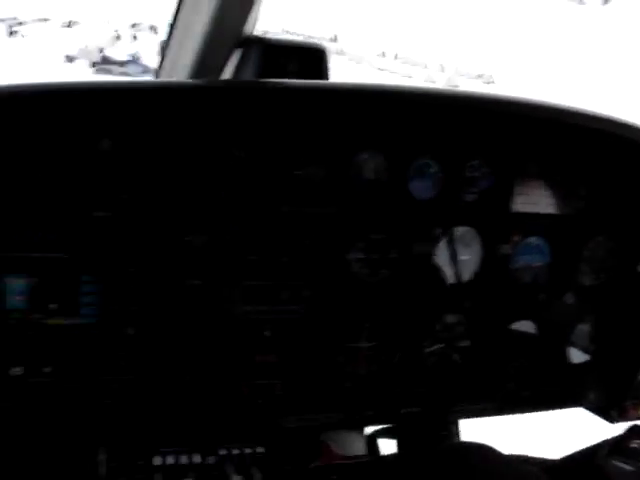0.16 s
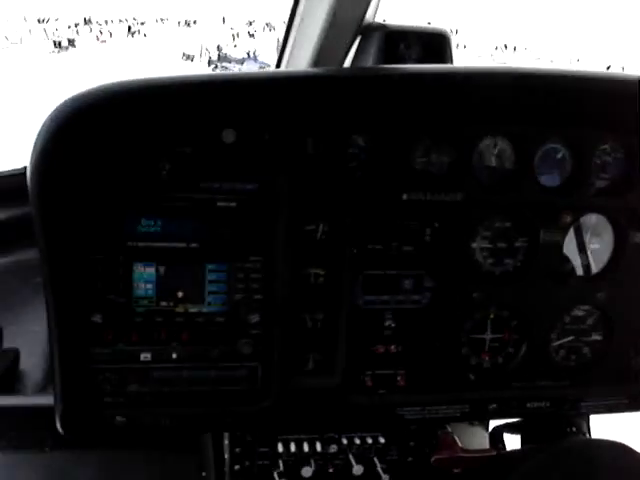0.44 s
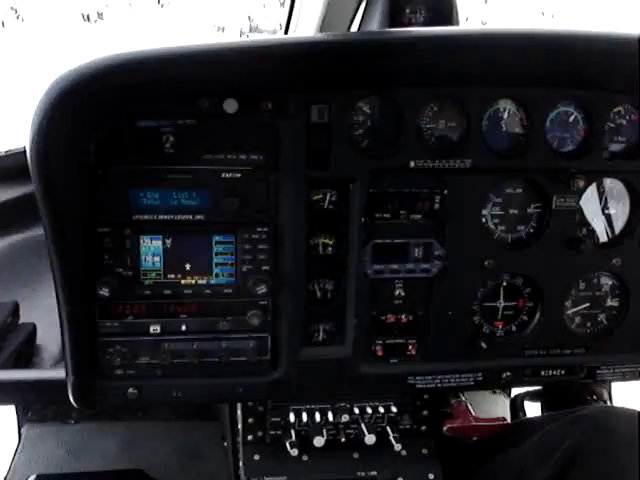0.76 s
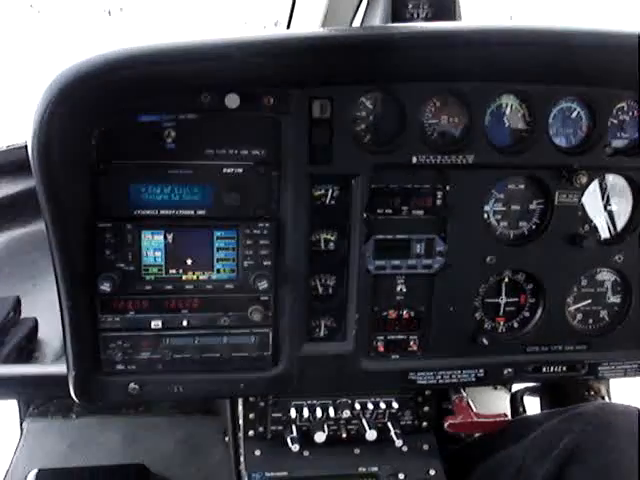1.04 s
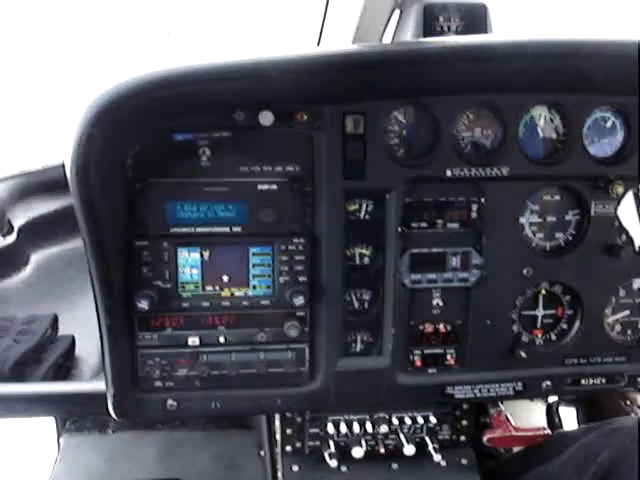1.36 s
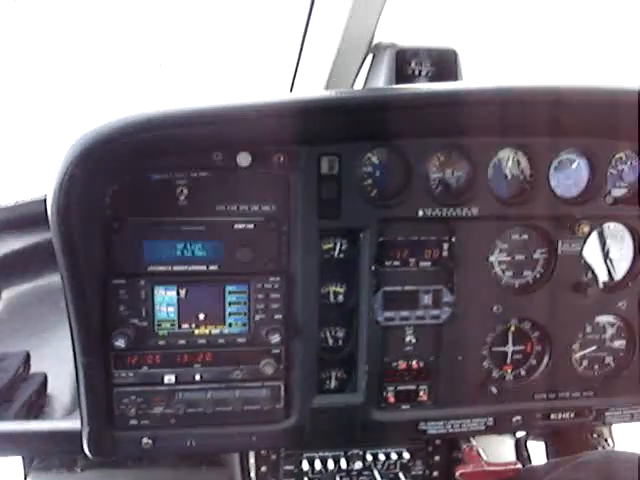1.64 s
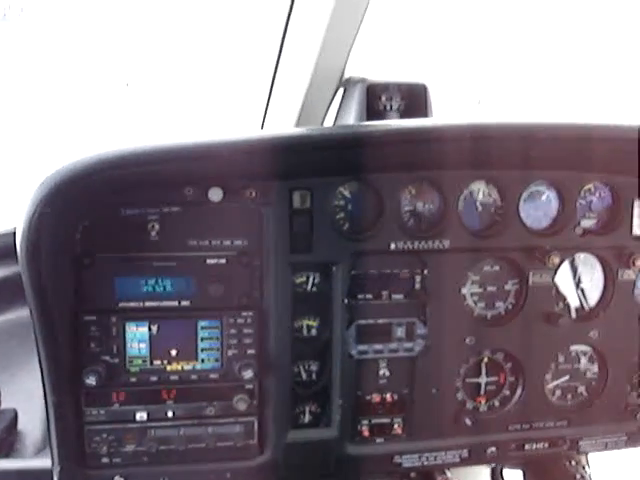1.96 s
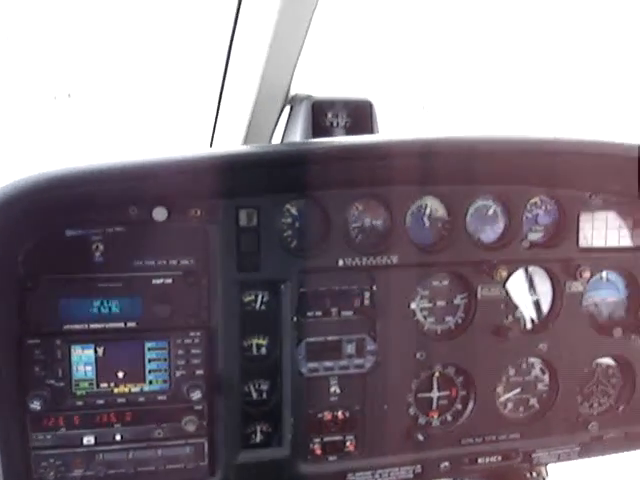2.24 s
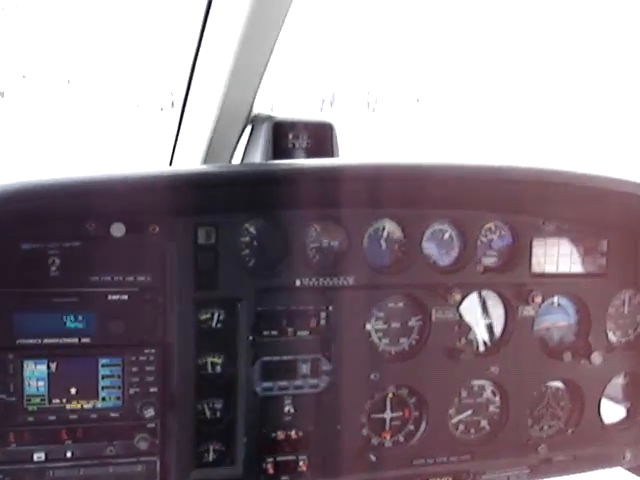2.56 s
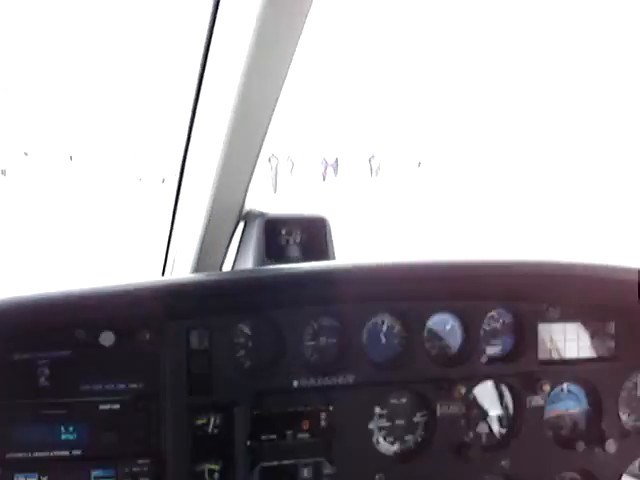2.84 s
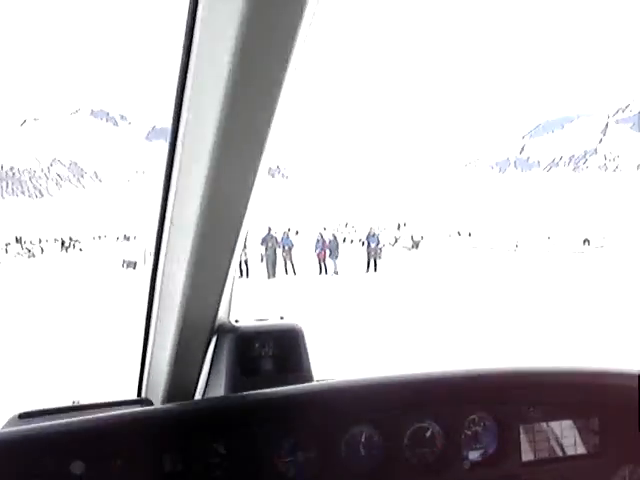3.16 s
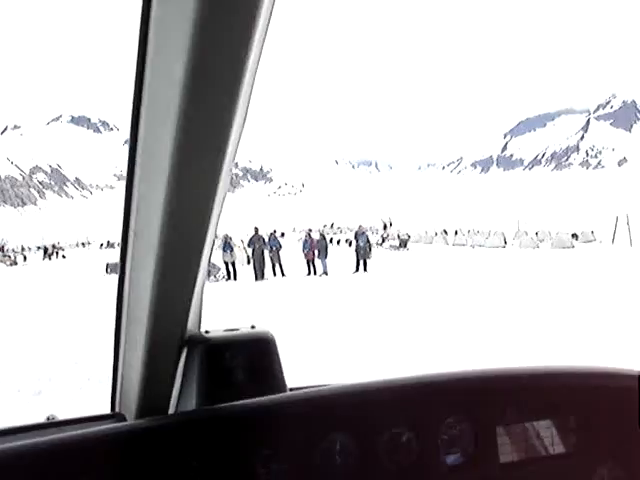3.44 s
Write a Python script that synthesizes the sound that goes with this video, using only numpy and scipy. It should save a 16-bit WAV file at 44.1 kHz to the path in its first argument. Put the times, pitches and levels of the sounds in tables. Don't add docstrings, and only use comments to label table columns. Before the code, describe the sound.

A turbine helicopter drones in its cabin, blades throbbing rapidly under steady high gear whine

```python
import sys
import numpy as np
from scipy import signal
from scipy.fft import rfft, irfft, next_fast_len
from scipy.io import wavfile
from scipy.ndimage import uniform_filter1d, map_coordinates

SR = 44100
rng = np.random.default_rng(int(sys.argv[2]) if len(sys.argv) > 2 else 0)


def gain_from_decibels(decibels):
    exponent = np.asarray(decibels, float) / 20
    return 10 ** exponent


def transcribe(signal):
    frames = np.atleast_2d(signal).T
    limited = np.clip(frames, -1, 1)
    pcm = np.round(limited * 32767).astype(np.int16)
    wavfile.write(sys.argv[1], SR, pcm)


N = 159201

NOMINAL_HZ = 1717.8
BLADE_HZ = 19.48


def unit(x):
    return x / np.sqrt(np.mean(x ** 2) + 1e-20)


def curves(rows):
    s, *cols = np.transpose(rows)
    return [np.interp(np.arange(N) / SR, s, c) for c in cols]


def wobble(rate):
    coarse = np.arange(0, N + 64, 64)
    knots = rng.standard_normal(int(N * 100 / SR) + 4)
    smooth = map_coordinates(knots, [coarse * rate / SR])
    return np.interp(np.arange(N), coarse, smooth)


def noise(points, patchy_db):
    hz, _, z = signal.stft(rng.standard_normal(N + 1024), SR, nperseg=1024)
    patches = uniform_filter1d(rng.standard_normal(z.shape), size=9, axis=0)
    patches = unit(uniform_filter1d(patches, size=4, axis=1))
    f, db = np.transpose(points)
    colour = np.interp(np.log(hz + 1), np.log(f), db, left=-120, right=-120)[:, None]
    shaped = z * gain_from_decibels(colour + patchy_db * patches)
    return unit(signal.istft(shaped, SR, nperseg=1024)[1][:N])


def tone(hz, db, clock, shake_db, drift):
    level = np.sqrt(2) * gain_from_decibels(db + shake_db * wobble(9))
    return level * np.sin(2 * np.pi * hz * clock + drift * wobble(5.99))


def turns():
    # t/s, f/Hz
    speed = [(0.0, 1725.4), (0.15, 1725.2), (0.35, 1722.5), (0.6, 1719.6), (1.1, 1718.2), (1.3, 1716.8),
             (1.5, 1713.5), (1.97, 1705.1), (2.2, 1704.4), (2.45, 1706.5), (2.88, 1714.7), (3.05, 1717.0),
             (3.3, 1718.3), (3.61, 1717.1)]
    return np.cumsum(curves(speed)[0]) / NOMINAL_HZ / SR


def pumping(clock):
    first_pass_s = .004
    rise, hold, fall = .2, .4, .3
    u = ((clock - first_pass_s) * BLADE_HZ) % 1
    swell = np.clip(u / rise, 0, 1) * np.clip(1 - (u - rise - hold) / fall, 0, 1)
    return swell - swell.mean() + .3 * wobble(35.1)


def turbine_hiss():
    # f/Hz, level/dB per Hz
    colour = [(2000, -17), (3500, -3), (5000, 0.5), (6900, -1.5), (7100, -3), (11000, -2)]
    flutter_db = 0.27 * wobble(40) + .5 * wobble(90)
    return gain_from_decibels(-40) * unit(gain_from_decibels(flutter_db) * noise(colour, patchy_db=0.24))


def air_rush(pump):
    # f/Hz, level/dB per Hz
    colour = [(300, -10.5), (430, 0), (640, -7), (1300, -12), (1800, -19.5), (3200, -24), (3700, -28),
              (5500, -41.5)]
    # t/s, level/dB
    facing = [(0, 3), (.2, 1), (.9, 0), (1.35, 0.5), (1.8, 0.5), (2.2, 0.5), (2.6, 0), (3.1, -1),
              (3.6, -1.5)]
    rush = unit(gain_from_decibels(3.8 * pump) * noise(colour, patchy_db=0.93))
    return gain_from_decibels(-24) * rush * gain_from_decibels(curves(facing)[0])


def downwash_roar(pump):
    # f/Hz, level/dB per Hz
    colour = [(25, -27), (50, -23), (88, -14.5), (120, -2), (185, -6), (235, 1), (350, -0.5), (800, -31)]
    wake = noise(colour, patchy_db=1.2)
    wake = wake + .2 * np.roll(wake, round(SR / BLADE_HZ) + 8)
    return gain_from_decibels(-20) * unit(gain_from_decibels(3.8 * pump) * wake)


def canopy_knocks():
    # t/s, peak level/dB, f/Hz
    knocks = [
        (.0345, -5, 380),
        (.127, -9, 260),
    ]
    t = np.arange(N) / SR
    out = np.zeros(N)
    for s, db, hz in knocks:
        fade = np.exp(-((t - s) * hz * 2.2) ** 2)
        out += gain_from_decibels(db) * np.cos(2 * np.pi * hz * (t - s)) * fade
    return out


def rotors(clock):
    main_levels = [-35.5, -42.5, -45.5, -50.5, -51, -37]
    tail_levels = [-37, -31, -34, -33.5]
    out = np.zeros(N)
    for k, db in enumerate(main_levels, 1):
        out += tone(k * BLADE_HZ, db, clock, shake_db=2.6, drift=0.33)
    for k, db in enumerate(tail_levels, 1):
        out += tone(k * 68.92, db, clock, shake_db=1.5, drift=0.36)
    return out


def fan_whine():
    # f/Hz, level/dB
    fans = [(2622, -59), (3091.6, -58), (3938, -59), (6376, -66), (8805, -61), (9879, -67)]
    return sum(tone(hz, db, np.arange(N) / SR, shake_db=3.5, drift=0.8) for hz, db in fans)


def gears(clock):
    # t/s, then level/dB of multiples 1, 2, 3
    bevel = [(0.0, -31, -47, -58.0), (0.15, -29.0, -45.5, -54), (0.351, -27.5, -44.5, -49),
             (0.601, -31.5, -51, -59), (0.85, -30.0, -43.5, -48.5), (1.1, -33, -42.5, -48.5),
             (1.3, -30, -44, -52), (1.5, -33.5, -46.5, -51), (1.75, -36.5, -45, -60),
             (1.97, -44.0, -39.5, -68), (2.2, -33, -42, -55), (2.45, -34, -36.0, -46.5),
             (2.7, -38, -40.0, -48.0), (2.88, -30.0, -41.5, -44.0), (3.05, -27, -38.5, -56),
             (3.3, -26.0, -45.5, -64), (3.61, -24, -42.5, -55)]
    # t/s, then level/dB of multiples 1, 2, 5, 6 and of an accessory gear
    planet = [(0.0, -26.5, -39, -53, -56, -59), (0.15, -31.5, -37.5, -50, -59, -58),
              (0.35, -32.0, -29.5, -49, -55, -54), (0.6, -33, -31.5, -52, -64, -58),
              (0.85, -30, -31.5, -52, -54.0, -51.0), (1.1, -36.5, -31.5, -51, -55, -54),
              (1.3, -32, -30.5, -53, -57, -50), (1.5, -36.5, -31, -58, -62, -48),
              (1.75, -32.5, -28, -47, -64, -53), (1.97, -29.0, -33, -44.5, -63, -51.0),
              (2.2, -28.5, -29.5, -47, -49, -45), (2.45, -28.5, -33.5, -44.5, -50, -58),
              (2.7, -29, -31.5, -44.5, -49, -53.0), (2.88, -31, -37.5, -45.5, -46, -53.0),
              (3.05, -27, -42, -41, -44, -47), (3.3, -27.0, -52, -57, -56, -52.0),
              (3.61, -26, -36, -47, -61, -45.0)]
    # f/Hz at normal speed, level/dB
    weaker = [(1111.7, -48), (1293.5, -48), (1689.8, -48), (1949.7, -54), (2599.6, -53), (4516.5, -65),
              (4549.1, -60)]
    planet_hz = [k * 649.9 for k in (1, 2, 5, 6)] + [2565]
    out = np.zeros(N)
    for k, db in enumerate(curves(bevel), 1):
        out += tone(k * NOMINAL_HZ, db, clock, shake_db=.7, drift=.25)
    for hz, db in zip(planet_hz, curves(planet)):
        out += tone(hz, db, clock, shake_db=.3 + hz / 1500, drift=hz / 4000)
    for hz, db in weaker:
        out += tone(hz, db, clock, shake_db=0.5, drift=0.87)
    return out


def scene():
    clock = turns()
    pump = pumping(clock)
    air = turbine_hiss() + air_rush(pump) + downwash_roar(pump)
    whine = gain_from_decibels(2.3 * pump) * (fan_whine() + gears(clock))
    return (air + canopy_knocks() + rotors(clock) + whine)[None]


def thinned(x):
    edge_hz, stop_hz, edge_db = 9950, 10260, 68
    hole_hz, hole_share, hole_db = 4800, .04, 40
    hz, _, z = signal.stft(x, SR, nperseg=256, noverlap=192)
    cells = rng.standard_normal((2, len(hz) // 4 + 1, z.shape[-1] // 7 + 1))
    blocks = np.repeat(np.repeat(cells, 4, 1), 7, 2)
    rough, chance = blocks[:, :len(hz), :z.shape[-1]]
    lost = chance + .5 * (hz > edge_hz - 500)[:, None] > np.quantile(chance, 1 - hole_share)
    z = z * gain_from_decibels((hz > hole_hz)[:, None] * (2.2 * rough - hole_db * lost))
    x = signal.istft(z, SR, nperseg=256, noverlap=192)[1][:, :N]
    m = next_fast_len(N + 8192)
    edge = np.clip((np.fft.rfftfreq(m, 1 / SR) - edge_hz) / (stop_hz - edge_hz), 0, 2)
    return irfft(rfft(x, m) * gain_from_decibels(-edge_db * edge ** 2), m)[:, :N]


def roll_off(x):
    return signal.sosfilt(signal.butter(12, 11300, fs=SR, output="sos"), x)


def record(dry):
    # t/s, depth/dB, recovery/s
    ducks = [
        (0.331, 1, .3),
        (.54, 0.5, .15),
        (1.14, -0.5, .08),
        (1.40, 0, .2),
        (1.705, 3, .06),
        (2.02, 1.5, .2),
        (2.33, 0.5, .1),
        (2.64, 1, .08),
        (2.935, 5, .07),
    ]
    t = np.arange(N) / SR
    duck_db = np.zeros(N)
    for s, depth_db, recovery_s in ducks:
        late = np.maximum(t - s, 0)
        duck_db += depth_db * (1 - np.exp(-late / .003)) * np.exp(-late / recovery_s)
    x = dry * gain_from_decibels(duck_db.mean() - duck_db)
    x = x / (1 + np.abs(x / .7) ** 4) ** (1 / 4)
    return roll_off(thinned(x))


dry = scene()
out = record(dry)
transcribe(out)
```